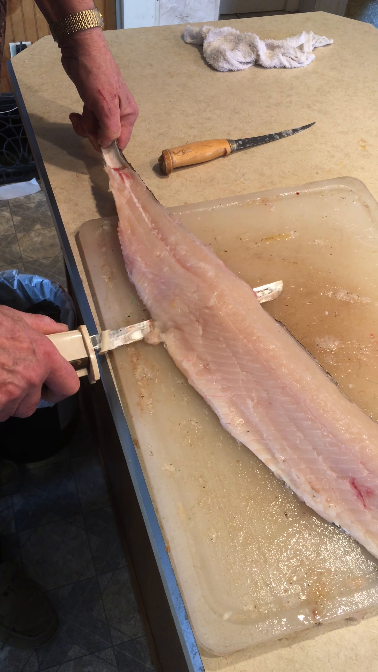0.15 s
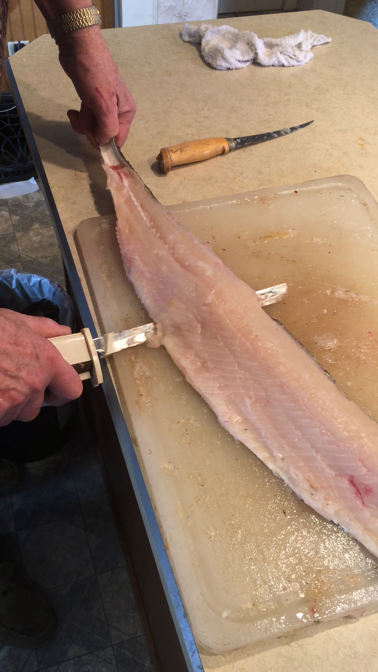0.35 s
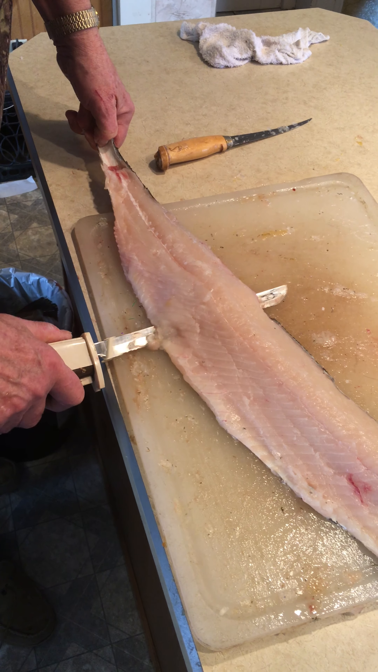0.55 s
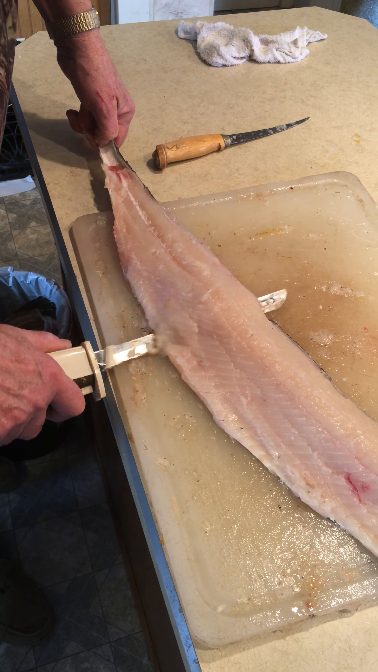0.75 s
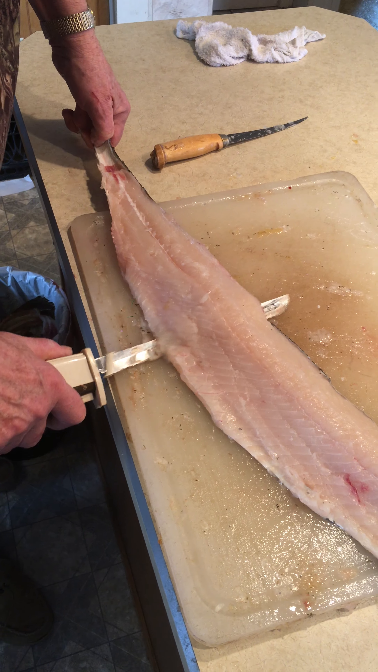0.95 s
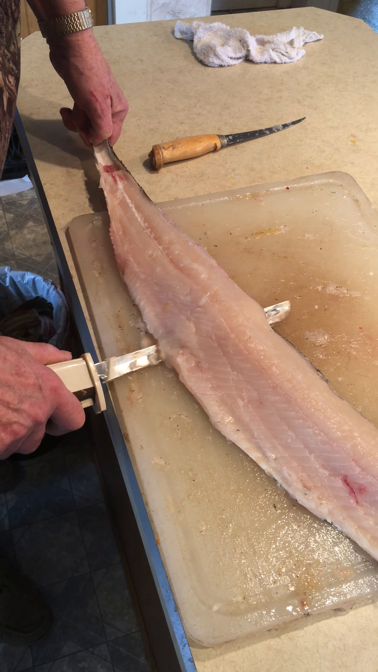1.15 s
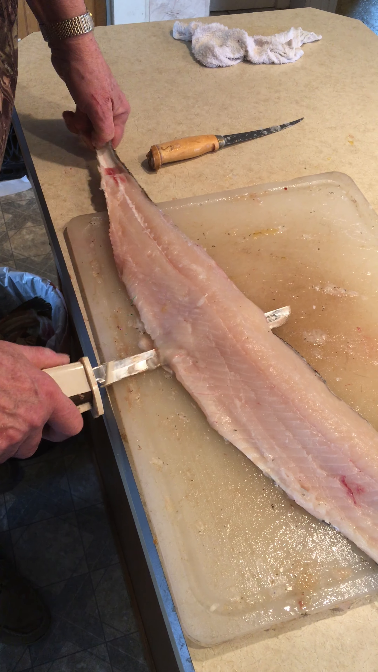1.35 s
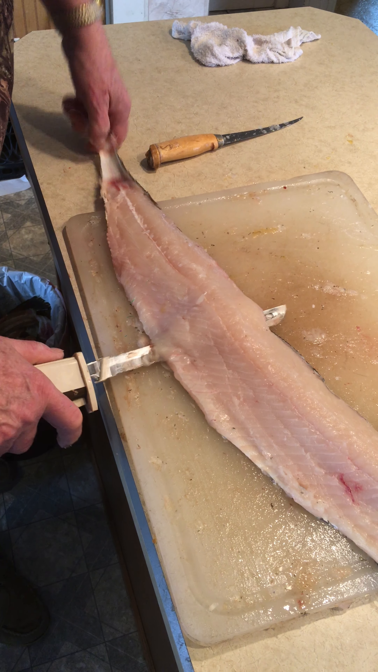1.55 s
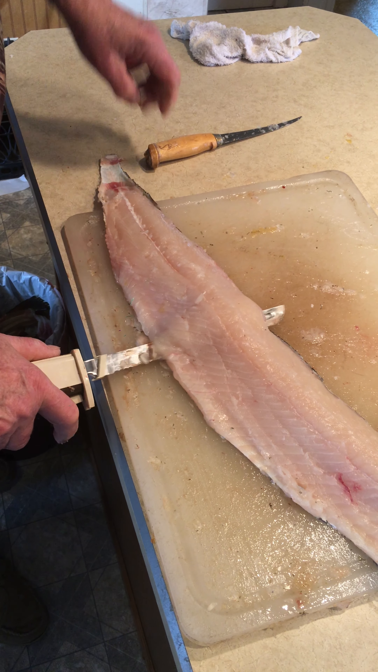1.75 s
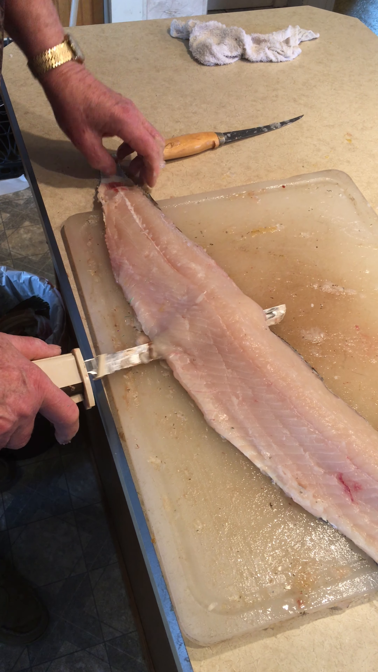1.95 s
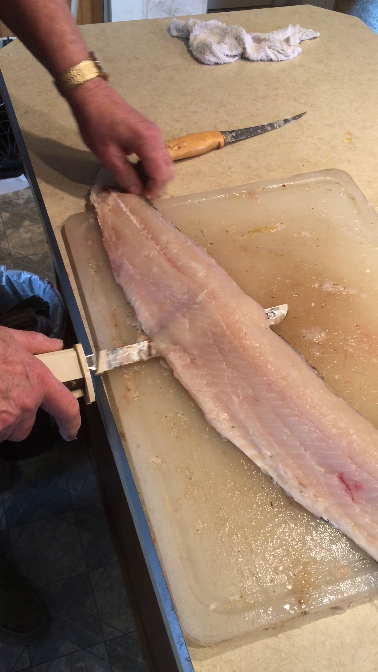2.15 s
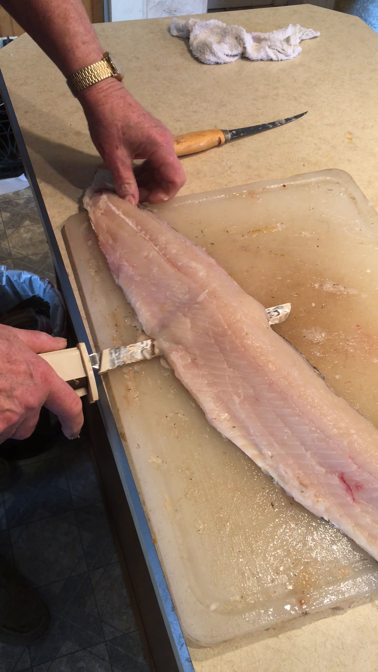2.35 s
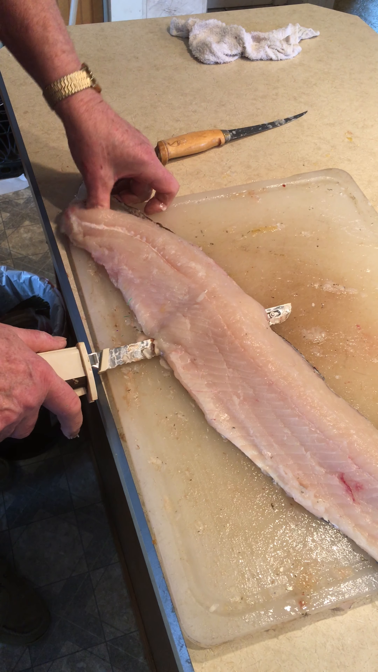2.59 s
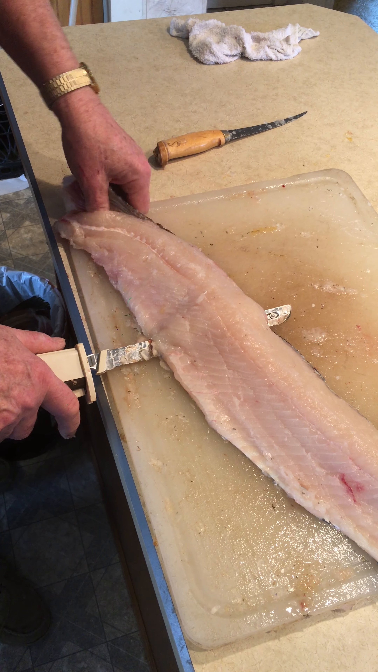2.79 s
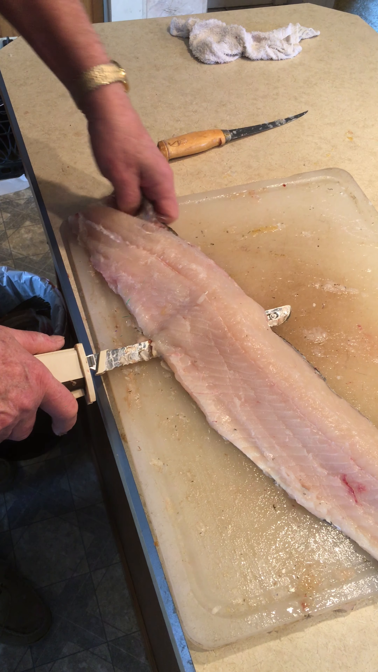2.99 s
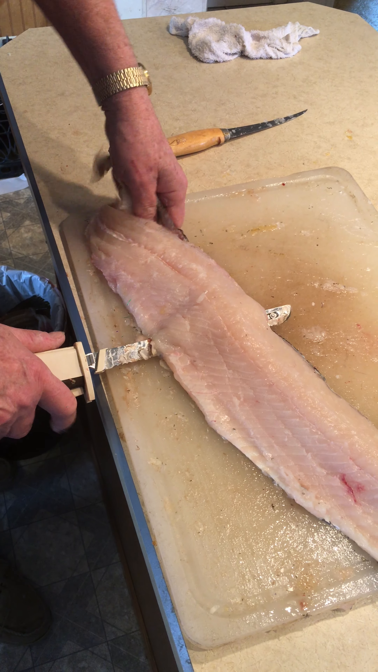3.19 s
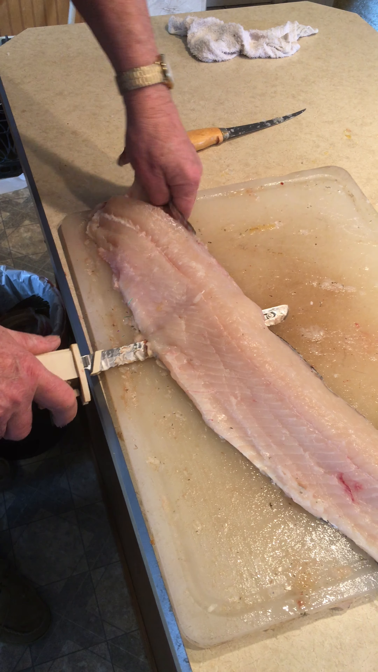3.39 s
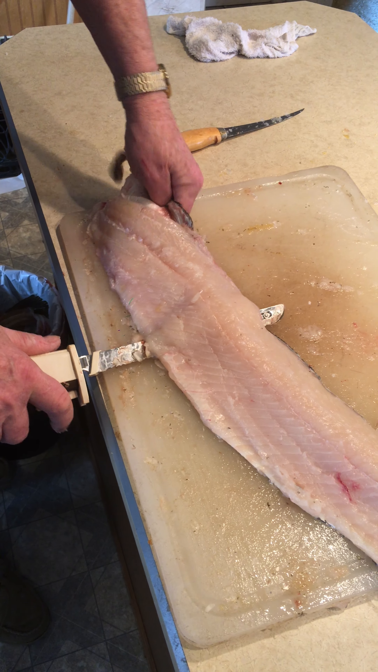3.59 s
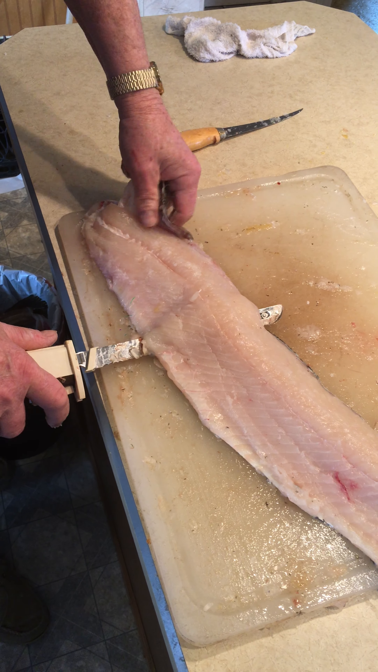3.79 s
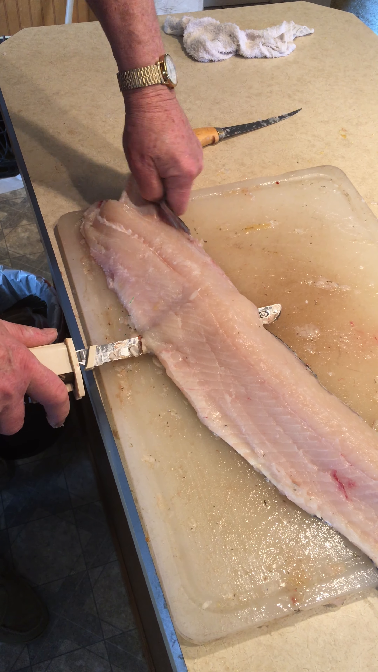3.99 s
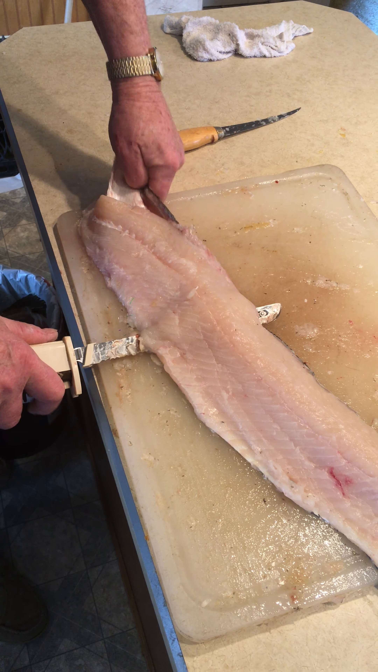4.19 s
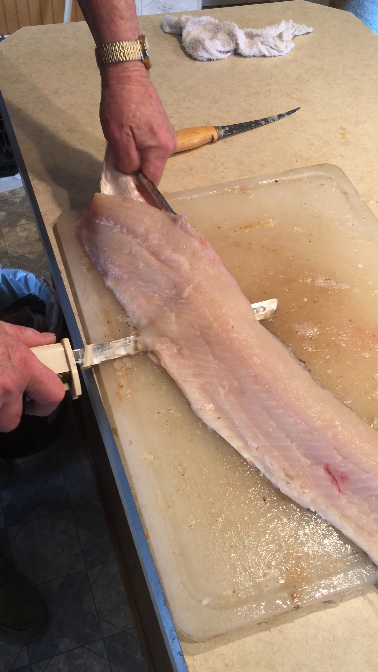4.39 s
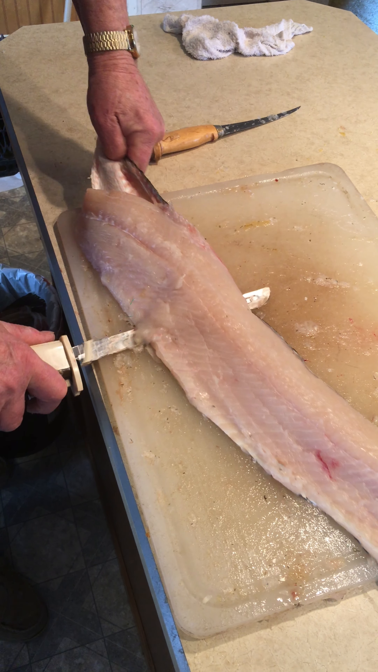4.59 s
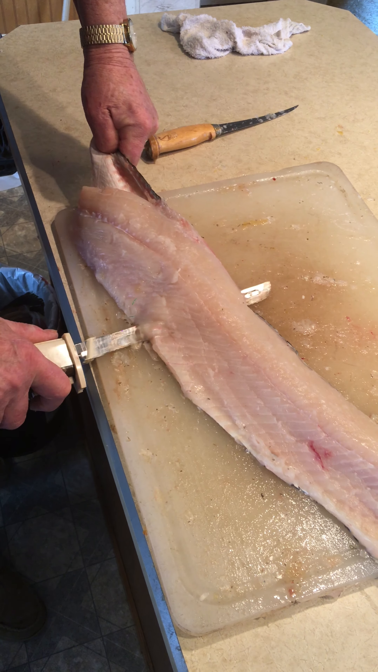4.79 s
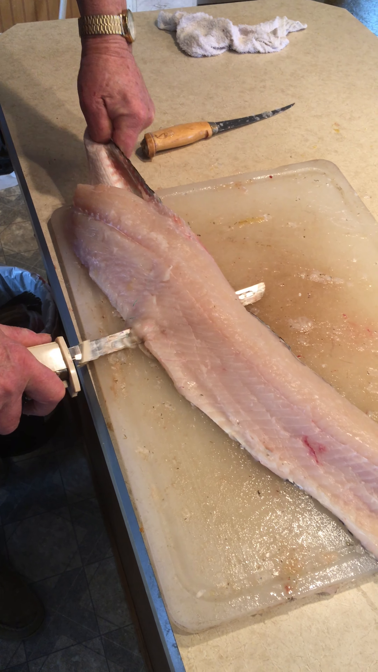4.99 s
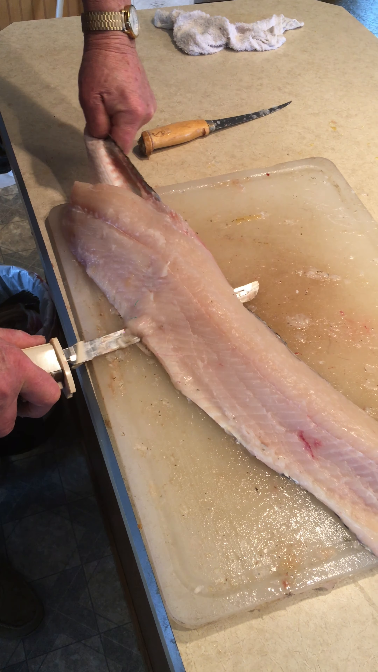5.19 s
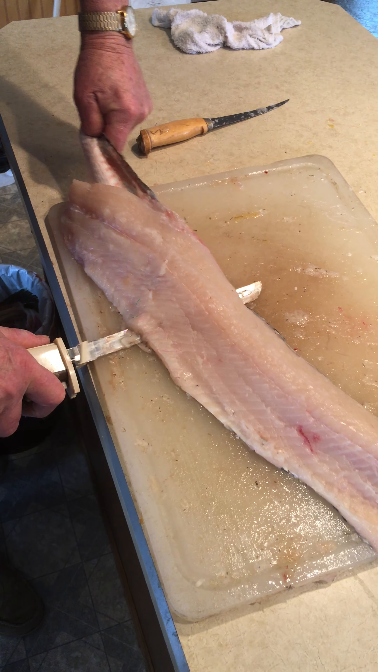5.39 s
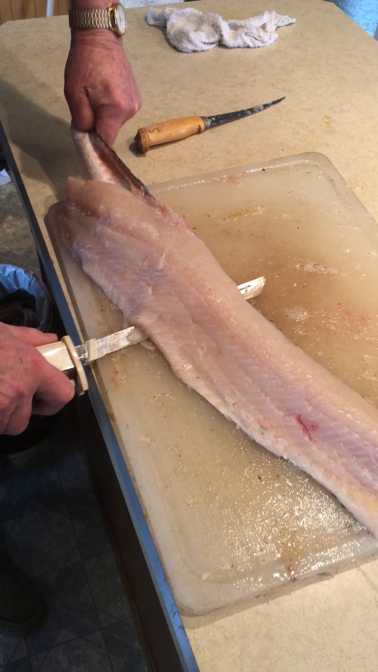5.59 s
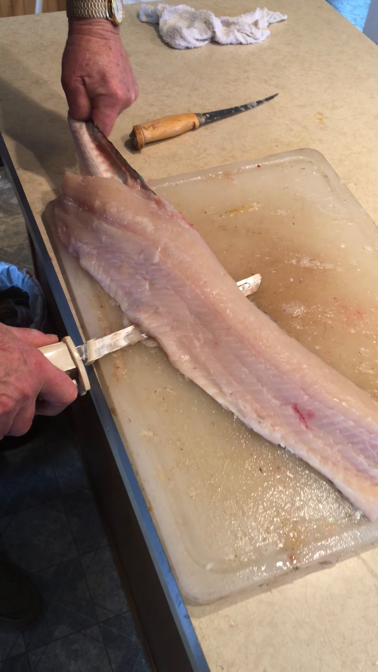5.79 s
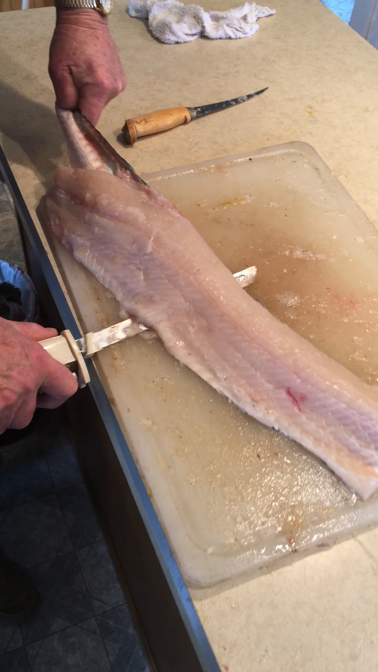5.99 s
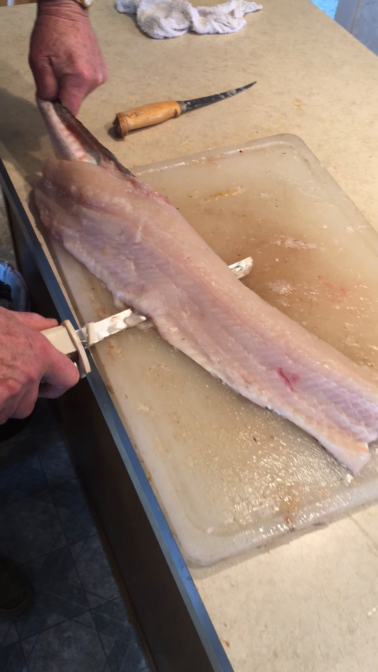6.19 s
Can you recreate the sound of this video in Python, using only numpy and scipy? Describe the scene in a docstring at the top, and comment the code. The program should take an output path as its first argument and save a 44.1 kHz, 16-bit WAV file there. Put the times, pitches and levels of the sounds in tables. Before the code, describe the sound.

A harsh, buzzing electric knife skins a fish on a plastic board, heard close with slight indoor reverberation. The motor coasts down, its rattle breaking into separate knocks before stopping. In the quiet, muffled thuds, light rubbing and squelchy skin noises grow busier over faint room tone. The knife clicks on again, revs up quickly, knocks on the board a few times and keeps whining and rattling.

```python
"""Skinning a fish with an electric knife

An electric fillet knife skins a fish on a plastic board in a small kitchen.
Its mains motor whines and drives two blades to and fro through a rattling gear, louder the faster it turns.
When the trigger is let go it coasts to a halt against friction; pressed again, it spins up with sparking brushes.
In the pause a hand takes a new grip on the wet skin, with squelches and soft bumps on the counter.
Tones are sine waves locked to the blade strokes; knocks, smacks and rubbing are filtered pulses and noise."""
import sys
import numpy as np
from scipy import signal
from scipy.fft import rfft, irfft, next_fast_len
from scipy.io import wavfile
from scipy.ndimage import map_coordinates

SR = 44100
rng = np.random.default_rng(int(sys.argv[2]) if len(sys.argv) > 2 else 0)


def transcribe(signal):
    """Save signal, clipped to [-1, 1], as a 16-bit WAV file at the path in sys.argv[1]."""
    frames = np.atleast_2d(signal).T
    limited = np.clip(frames, -1, 1)
    pcm = np.round(limited * 32767).astype(np.int16)
    wavfile.write(sys.argv[1], SR, pcm)


N = 275625  # length in samples

# Levels in the tables set the balance within one sound, unless a peak is named; mixing gains follow later.
# Tables of tone colour all have the columns: pitch_hz, level_db (per Hz).

# speed that the cut allows the motor, one table per cut of the knife: time_s, speed_strokes_per_s
CUT_PACE = [
    [(0, 28.68), (.4, 28.68), (.65, 28.96), (.85, 28.96), (1.05, 28.68), (1.25, 28.66), (1.43, 28.87)],
    [(4.55, 29), (4.7, 29.18), (4.85, 29.65), (5.1, 29.33), (5.3, 29.97), (5.5, 29.95), (5.75, 29.2),
     (6, 28.63), (6.25, 28.18)],
]
# the whine is split by the mains into strands 120 Hz apart, one table per cut: time_s, main_db, upper_db
WHINE_STRANDS = [
    [(0, -38, -35), (.22, -33, -34.5), (.35, -38.5, -31.5), (.55, -34, -41), (.8, -34.5, -44),
     (.95, -30.5, -41), (1.2, -29, -37), (1.34, -30.5, -46), (1.42, -35, -45)],
    [(4.5, -46, -46), (4.68, -33.5, -42), (4.83, -37, -28), (4.97, -38.5, -35.5), (5.1, -34.5, -47),
     (5.25, -27, -42), (5.5, -27.5, -42), (5.72, -30.5, -64.5), (5.88, -31.5, -47), (6.04, -34, -35),
     (6.14, -50.5, -26), (6.25, -26, -35)],
]
# tones of the loaded drive: multiple_of_stroke_rate, then level_db in the first and in the second cut
HUM_MULTIPLES = [3, 4, 5, 6, 7, 10, 15, 17, 26, 29, 32, 33, 70, 89, 90, 290, 400, 440, 480]
HUM_FIRST_DB = [-53, -57, -63, -45.5, -51, -43, -54, -50, -46, -41.5, -43, -40, -41.5, -48, -40, -52, -52,
                -53, -58]
HUM_SECOND_DB = [-54.5, -56, -54, -46, -51.5, -46, -67, -72, -49.5, -44.5, -51, -41.5, -43.5, -42, -45.5,
                 -53, -59, -57, -64]
# gear contacts within each stroke: place_share_of_stroke, load_knock_db, coast_knock_db, click_db, tip_tick_db,
# fade_power_of_speed (half of coast_knock_db still counts under load)
GEAR_CONTACTS = [(0, -20, -10, -3, -1, 0), (.235, -5, -15, -2, -7, .6), (.52, -9, -24, -14, -26, 1),
                 (.752, 2, -12, -2, -18, 1), (.785, -6, -10, -4, -26, 1)]
# how hard the blades bite into the skin: time_s, added_knock_db (under load)
BITE_FORCE = [(0, 1), (.55, 1), (.8, 2), (1.15, 0), (1.35, 2), (1.55, 2), (4.3, -2), (5, -3), (5.3, 0),
              (5.75, 1.5), (6.25, -.5)]
# loudness against speed: load_db, coast_db (both at full speed), load_power_of_speed, coast_power_of_speed
RATTLE_LOUDNESS = (-33, -36.5, 1.58, 1.38)
HISS_LOUDNESS = (-38, -37, 1.1, 1.27)
WHIRR_LOUDNESS = (-41.5, -45, 2.4, 0.3)
# tone colours of the housing, the hollow handle and the hissing blades
HOUSING_COLOUR = [(100, -36.5), (250, -12), (400, -5), (650, -8), (800, 2.5), (980, -3), (1150, -1),
                  (1550, -5), (2100, -2.5), (2500, -4), (2750, -7.5), (3300, -7.5), (4200, -5.5),
                  (5200, -15), (12000, -77)]
HANDLE_COLOUR = [(40, -52), (100, -33), (340, -7), (620, -14), (750, 2), (835, 3), (890, -1), (950, 1.5),
                 (1040, -12), (1250, -1.5), (1500, -11), (3300, -9), (4200, -10), (5200, -12), (12000, -40)]
BLADE_COLOUR = [(2500, -46), (5000, 5), (6300, 8), (7500, 1), (9300, 5.5), (10500, 0.5), (12500, 1),
                (15000, -5), (18000, -21)]
# tone colours of gear knocks, of clicks, of blade tip ticks and of the slack gear's dull clunk
KNOCK_COLOUR = [(40, -38), (120, -15), (340, -15.5), (620, 4.5), (830, 16), (960, 12), (1100, 5.5),
                (1280, 5.5), (1600, -9), (2500, -4.5), (3300, -19), (4250, -32.5), (5000, -25), (6000, -15),
                (12000, -57)]
CLICK_COLOUR = [(1000, 5), (3000, 1), (5500, -8), (7000, -6), (8000, 2.5), (9300, 4.5), (11000, -27),
                (13000, 3.5), (18000, -21)]
TIP_COLOUR = [(2000, -44), (6000, -37), (7000, 6), (8000, -12), (10200, -1), (11300, 5.5), (13200, -14),
              (14500, -1), (18000, -18)]
CLUNK_COLOUR = [(120, -11), (320, 5.5), (600, -3), (1500, 0.5), (2500, -3.5), (8000, -16)]
# overtones of the whirr: multiple_of_stroke_rate, load_db, coast_db, fuzz_hz, clean_share
WHIRR_OVERTONES = [(80, -10, -21, 160, .8), (160, -5, -8, 330, .7), (240, -5, -12, 400, .8),
                   (340, -8, -8, 520, .5)]
# the housing's response to those overtones: pitch_hz, gain_db
WHIRR_RESPONSE = [(650, -15), (900, 4), (1150, -28), (1700, -54), (2400, -3.5), (2750, 0.5), (3150, 3.5),
                  (3400, -1), (3900, -0.5), (5200, -23), (7000, -17), (9000, -8.5)]
# tone colour of the brushes scraping on the slowing commutator
SCRAPE_COLOUR = [(900, -18), (1800, -8), (2500, 8), (3300, 2.5), (4300, 0.5), (6000, -19), (12000, -36)]
# falling whine of the coasting commutator: multiple_of_stroke_rate, level_db, fuzz_hz, fuzz_share
FALLING_WHINE = [(342, -46.5, 450, 1), (480, -63, 300, 1)]
# its strength, greatest just before the brushes stop singing: speed_strokes_per_s, gain
FALLING_WHINE_GAIN = [(5.6, 0), (6.7, 1.25), (8.5, .9), (11.5, 1), (14.5, .55), (17, .2), (29, .25)]
# tone colour of the blades chattering in their sockets at both ends of the stroke
CHATTER_COLOUR = [(2000, -27.5), (3400, -10), (3750, -1.5), (4250, 3), (4650, -4.5), (5200, -11),
                  (9000, -23.5)]
# tone colour of the room tone, and the kitchen's reverberation: pitch_hz, t60_s
ROOM_COLOUR = [(20, -8), (35, -1), (60, 8), (108, -1.5), (192, -7), (516, -15.5), (1090, -16), (3010, -22),
               (4800, -24.5), (9300, -45), (14400, -32), (18000, -37)]
KITCHEN_DECAY = [(150, 0.41), (1200, 0.46), (3000, 0.41), (8000, 0.11), (16000, 0.25)]
# the handle leans on the counter and thumps once a stroke: start_s, length_s, level_db, place_share_of_stroke
HANDLE_LEANS = [(0.904, 0.185, -25, 0.767), (4.899, 0.123, -25.5, 0.225)]
# hand or handle bumps the counter, each with one rebound: start_s, level_db
COUNTER_BUMPS = [(1.989, -34), (2.191, -40), (2.485, -34.5), (2.969, -32.5), (3.133, -27.5), (3.53, -43),
                 (4.909, -45), (4.94, -25.5)]
# taps on the board, and the click of the trigger at 4.29 s: start_s, peak_db, pitch_hz
TAPS_AND_CLICK = [(1.926, -22, 1290), (2.48, -34.5, 900), (3.881, -37, 900), (4.213, -42.5, 1380),
                  (4.29, -36, 1100), (4.904, -19, 1370), (4.912, -16, 960), (4.941, -20, 1300),
                  (4.947, -20, 960)]
# tone colour of thuds on the counter
THUD_COLOUR = [(25, -21), (48, -3.5), (75, -7), (115, 0), (170, -6.5), (280, -17), (500, -29), (1200, -31),
               (4000, -75)]
# the fillet slides on the board: height_s, rub_db, rumble_db, rise_s, fall_s
FILLET_SLIDES = [(2.599, -55, -70, 0.066, 0.28), (2.81, -64, -59, 0.093, 0.075),
                 (3.22, -80, -56, 0.08, 0.12), (3.5, -60, -53.5, 0.27, 0.1), (3.66, -57, -73, 0.068, 0.17),
                 (4.2, -99, -63, 0.13, .1)]
# tone colours of the rub, of the counter's rumble and of the hollow hum
RUB_COLOUR = [(400, -8), (900, -8.5), (1150, -11.5), (1450, -8), (2200, -6.5), (2800, -11.5), (5000, -30)]
RUMBLE_COLOUR = [(20, -30), (48, 14.5), (110, -5), (300, -25), (900, -57)]
HOLLOW_COLOUR = [(600, -30), (1040, -21), (1120, -6), (1210, -8), (1800, -50)]
# loudness of the hollow hum: time_s, level_db
HOLLOW_LOUDNESS = [(2.3, -85), (2.6, -61), (3.2, -75), (3.42, -66), (3.7, -61.5), (3.95, -70), (4.2, -93)]
# the fingers squeeze or peel the skin: height_s, crackle_db, rise_s, fall_s
SKIN_SQUEEZES = [(2.5, -60.5, 0.092, 0.33), (3.28, -58.5, 0.21, 0.098), (3.43, -57, 0.02, 0.12),
                 (3.72, -51.5, 0.045, 0.06), (3.86, -57, 0.065, 0.059), (4.14, -59.5, 0.13, 0.19),
                 (4.29, -55.5, 0.085, 0.043)]
# the loudest smacks of wet skin: start_s, peak_db, pitch_hz, t60_s, snap_peak_db
SKIN_SMACKS = [(2.648, -43, 14000, .008, -48), (3.14, -42.5, 2200, 0.018, -49),
               (3.157, -44, 4300, 0.01, -38), (3.227, -48, 6000, .006, -40), (3.241, -43, 2360, .01, -52),
               (3.267, -31, 2000, 0.025, -38), (3.295, -40, 2000, 0.01, -55),
               (3.304, -28.5, 8060, 0.0059, -45), (3.38, -57, 4500, .006, -44),
               (3.398, -34, 3200, 0.027, -35), (3.405, -41, 3600, .008, -36),
               (3.42, -40, 9000, 0.0054, -46), (3.446, -41, 2500, 0.0058, -38),
               (3.471, -23.5, 2350, 0.02, -53), (3.568, -44, 7000, .005, -50),
               (3.646, -49, 3280, .008, -59), (3.658, -32.5, 3840, 0.0087, -51),
               (3.663, -34, 3860, 0.0094, -49), (3.668, -37, 4500, .007, -50),
               (3.693, -24.5, 6140, .014, -48), (3.713, -32, 8000, 0.027, -40),
               (3.717, -31, 5600, 0.025, -44), (3.731, -29, 2420, 0.0058, -30),
               (3.734, -36, 3960, 0.004, -36), (3.738, -27, 2450, 0.0092, -42),
               (3.742, -30, 3460, 0.0065, -42), (3.763, -29.5, 3070, 0.026, -23),
               (3.809, -45, 5000, .004, -37), (3.822, -38, 3830, .008, -48), (3.847, -37, 5850, .02, -46),
               (3.866, -34, 7060, .004, -42), (3.871, -47, 8000, .004, -44), (3.882, -23, 7050, 0.003, -16),
               (3.902, -42, 7550, .003, -28), (3.918, -39, 3430, 0.0089, -29),
               (4.003, -42.5, 5030, 0.0082, -47), (4.059, -47, 4000, 0.0053, -32),
               (4.1, -37, 8500, .01, -45), (4.137, -38, 9100, 0.025, -45), (4.29, -34, 3700, 0.016, -36)]
# tone colour of the wet crackle
WET_COLOUR = [(500, -24), (1100, 8), (1600, 0), (2800, 6.5), (5000, 2.5), (8000, 6), (13000, 0.5),
              (18000, -15)]
# tone colour of the growl as each half wave of the mains jerks the starting motor
GROWL_COLOUR = [(200, -26), (600, -10), (780, -6), (900, 9), (1020, -4), (1250, -23), (2000, -30),
                (6000, -51)]

FULL_SPEED = 29  # strokes per second
FIRST_STROKE = .44  # where in the stroke the scene starts (share)
MAINS_HZ, TOP_HZ = 60, 18400  # mains frequency; nothing sounds above the second
# the trigger is let go and pressed again; the shaft breaks free a moment later (s)
OFF_S, ON_S, BREAKAWAY_S = 1.43, 4.29, .012
# the current rises and dies quickly; the gear takes longer to go slack (s)
SWITCH_S, SLACKEN_S = .024, .14
# steady friction (strokes per second lost each second), and a quick first sag (strokes per second, s)
FRICTION, SAG, SAG_S = 20.5, 1.5, .06
SPIN_UP_S = .205  # time constant of the rotor's energy
STRAIN_DB = 4.5  # extra rattle while the motor strains, greatest near standstill
# under load the clicks follow the knocks: dB added, share of the knock's dB
CLICK_LOAD_DB, CLICK_FOLLOWS = 4, .5
# loose knocks of the slack gear between the regular ones: per second, strength (dB)
LOOSE_PER_S, LOOSE_DB = 26, -11
WHINE_ORDER = 80  # multiple of the stroke rate
LOWER_STRAND_DB, HUM_COAST_DB = -45.5, -11  # lower whine strand; drive tones coasting against load
# a narrow housing resonance lifts each driven tone that sweeps through it: Hz, half width Hz, added gain
SING_HZ, SING_WIDTH_HZ, SING_GAIN = 1845, 40, 4
SHAFT_SHIVER = .002  # unsteadiness that blurs the highest tones (radians of the stroke)
# the straining brushes spark harder and flutter with the mains: gain, depth (0-1)
SPARK_GAIN, SPARK_FLUTTER = 24, .55
# coasting, the brushes fall quiet once a stroke: share of the stroke, depth (0-1), sharpness
LULL_AT, LULL_DEPTH, LULL_SHARP = .444, .98, 11
SCRAPE_DB, CRAWL = 1, 4.5  # scrape within the whirr; strokes per second below which the whirr fades
# blade chatter: dB, place within each half stroke (share), t60 of one chatter (s)
CHATTER_DB, CHATTER_AT, CHATTER_T60 = -32.5, .44, .022
# leaning handle: edge (s), share of shudder, and the pitch below which it cannot shake the counter
LEAN_EDGE_S, LEAN_SHUDDER, LEAN_LOW_HZ = .022, .031, 85
REBOUND_S, REBOUND_DB = .032, -7.5
# each smack has a bright snap of a slime film: Hz, t60 (s)
SNAP_HZ, SNAP_T60 = 12500, .0055
# stray smacks during a squeeze: tries per second, dB over the crackle, middle pitch
STRAY_PER_S, STRAY_DB, STRAY_HZ = 22, 11, 5200
# growl: dB at its height, time from trigger to height, rise and fall (s)
GROWL_DB, GROWL_PEAK_S, GROWL_RISE_S, GROWL_FALL_S = -37.5, .059, .021, .02


def amp(db):
    """Turns decibels into a gain."""
    return 10 ** (np.asarray(db) / 20)


def unit(x):
    """Scales a sound to an average strength (rms) of 1."""
    return x / np.sqrt(np.mean(x ** 2) + 1e-20)


def along(points, hz):
    """Reads (Hz, value) points on a logarithmic pitch axis."""
    f, v = np.transpose(points)
    return np.interp(np.log(hz + 1), np.log(f + 1), v)


def curve(rows):
    """Joins (s, value) rows by straight lines, one value per sample."""
    return np.interp(np.arange(N) / SR, *np.transpose(rows))


def noise():
    """White noise as long as the scene."""
    return rng.standard_normal(N)


def wobble(rate):
    """A smooth random curve with rate knots a second."""
    knots = rng.standard_normal(int(N * rate / SR) + 4)
    return map_coordinates(knots, [np.arange(N) * rate / SR])


def colour(x, spectrum, size=4096):
    """Rings x through a causal filter of energy 1 with the given spectrum's shape."""
    # folding the cepstrum gives a filter that never rings ahead of its blow
    cepstrum = irfft(np.log(amp(along(spectrum, np.fft.rfftfreq(size, 1 / SR)))))
    cepstrum[1:size // 2] *= 2
    cepstrum[size // 2:] = 0
    ring = irfft(np.exp(rfft(cepstrum)))
    return signal.fftconvolve(x, ring / np.linalg.norm(ring))[:N]


def burst(age, t60):
    """Envelope of a blow age seconds old, falling 60 dB in t60 seconds."""
    return (age >= 0) * amp(-60 * np.abs(age) / t60)


def swell(s, rise, fall):
    """Gain that grows to 1 at s seconds and dies away, with the two time constants given."""
    age = np.arange(N) / SR - s
    return np.exp(-np.maximum(age / fall, -age / rise))


def add(track, s, sound):
    """Mixes a sound into the track at s seconds."""
    part = track[round(s * SR):][:len(sound)]
    part += sound[:len(part)]


def strikes(strokes):
    """A unit impulse, placed between samples, each time the stroke count passes a whole number."""
    reached = np.maximum.accumulate(strokes)
    at = np.interp(np.arange(np.ceil(reached[0]), reached[-1]), reached, np.arange(N))
    taps = at.astype(int)[:, None] + np.arange(-7, 9)
    gap = taps - at[:, None]
    impulse = np.sinc(gap) * np.sinc(gap / 8)
    return np.bincount(np.clip(taps, 0, N - 1).ravel(), impulse.ravel(), N)


def pop(hz, t60, width, crack):
    """A short noise burst, peak 1, that rings around one pitch after a brief crack."""
    t = np.arange(SR // 8) / SR
    push = rng.standard_normal(len(t)) * burst(t, t60)
    ring = signal.lfilter(*signal.iirpeak(min(hz, TOP_HZ), 1 / width, SR), push)
    sound = unit(ring) + crack * unit(push * burst(t, 0.0017))
    return sound / np.abs(sound).max()


def trigger(release):
    """1 while the trigger is held; fades over release seconds when it is let go."""
    t = np.arange(N) / SR
    return np.clip(1 - (t - OFF_S) / release, 0, 1) + np.clip((t - ON_S) / SWITCH_S, 0, 1)


def shaft_speed():
    """Strokes per second: the motor holds its pace, coasts to a halt against friction, then spins up again."""
    t = np.arange(N) / SR
    first, second = map(curve, CUT_PACE)
    idle = np.maximum(t - OFF_S, 0)
    driven = np.maximum(t - ON_S - BREAKAWAY_S, 0)
    coasting = first - FRICTION * idle - SAG * (1 - np.exp(-idle / SAG_S))
    return np.maximum(coasting, 0) + second * np.sqrt(1 - np.exp(-driven / SPIN_UP_S))


def motor_strain(speed, load):
    """How far the driven motor is below full speed, from 0 to 1."""
    return load * np.clip(1 - speed / FULL_SPEED, 0, 1)


def loudness(law, speed, load):
    """Gain as a power of the speed, passing from the loaded law to the coasting one; silent at rest."""
    loaded_db, coasting_db, loaded_power, coasting_power = law
    ratio = np.maximum(speed, 1) / FULL_SPEED
    loaded = load * amp(loaded_db) * ratio ** loaded_power
    coasting = (1 - load) * amp(coasting_db) * ratio ** coasting_power
    return np.minimum(speed, 1) * (loaded + coasting)


def worn_teeth(strokes, fresh, size=1400):
    """Gear roughness: the same flaws pass on every stroke, mixed with a share of fresh noise."""
    bins = size // 2 + 1
    flaws = unit(irfft(np.exp(2j * np.pi * rng.random(bins)) * amp(rng.normal(0, 3.7, bins))))
    repeat = map_coordinates(flaws, [strokes % 1 * size], mode="grid-wrap")
    loose = np.clip(fresh, 0, 1)
    return np.sqrt(1 - loose) * repeat + np.sqrt(loose) * colour(noise(), [(200, -22), (1500, -11.0)])


def gear(strokes, speed, load):
    """The gear rattles in the housing, the blades hiss, and both knock at each turn of the stroke."""
    blows, knocks, clicks, ticks = np.zeros((4, N))
    bite_db = curve(BITE_FORCE)
    for share, loaded_db, coasting_db, click_db, tip_db, fade in GEAR_CONTACTS:
        turn, part = np.divmod(strokes - share + 1, 1)
        age = part / np.maximum(speed, 1)
        uneven = amp(rng.normal(0, 1.2, 256))[turn.astype(int) % 256]
        force = uneven * (speed > 1) * (speed / FULL_SPEED) ** fade
        weight = force * amp(load * (loaded_db + bite_db) + (1.5 - load) * coasting_db)
        blows += weight * strikes(strokes - share)
        knocks += weight * burst(age, 0.0097)
        click_level = amp(click_db + load * (CLICK_LOAD_DB + CLICK_FOLLOWS * loaded_db))
        clicks += force * click_level * burst(age, 0.0062)
        ticks += force * amp(tip_db) * burst(age, 0.0076)
    chance = rng.random(N) < LOOSE_PER_S / SR
    loose = (1 - load) * (speed > 1) * chance * rng.exponential(size=N).clip(0, 2)
    clicks += amp(LOOSE_DB) * signal.fftconvolve(loose, burst(np.arange(SR // 20) / SR, 0.014))[:N]
    # slow strokes knock nearly as hard, so they stand out while the motor coasts
    coast = (FULL_SPEED / np.maximum(speed, 6)) ** (.75 - 0.5 * load)
    shaft = 1 + 0.42 * np.cos(2 * np.pi * 20 * strokes)
    # without load the teeth run slack and no stroke is like the last
    slack = 0.31 * (1 - load)
    body = colour(shaft * worn_teeth(strokes, fresh=0.43 + slack), HOUSING_COLOUR)
    body += amp(9) * coast ** .5 * colour(knocks * worn_teeth(strokes, fresh=0.81 + slack), KNOCK_COLOUR)
    clunks = (1 - load) * burst(strokes % 1 / np.maximum(speed, 1), 0.043)
    body += amp(8.5) * coast * colour(clunks * noise(), CLUNK_COLOUR)
    # each blow also rings the hollow handle
    body += amp(14.6) * colour(blows, HANDLE_COLOUR)
    steel = amp(-4.0) * colour(shaft * worn_teeth(strokes, fresh=0.65), BLADE_COLOUR)
    steel += amp(6.5) * coast * colour(clicks * noise(), CLICK_COLOUR)
    steel += amp(8.5) * coast * colour(ticks * noise(), TIP_COLOUR)
    rattle = loudness(RATTLE_LOUDNESS, speed, load) * amp(STRAIN_DB * motor_strain(speed, load))
    return rattle * body + loudness(HISS_LOUDNESS, speed, load) * steel


def motor(strokes, speed, load):
    """Tones of the loaded drive, and a whine whose close strands beat at twice the mains frequency."""
    t = np.arange(N) / SR
    angle, mains = 2 * np.pi * strokes, 2 * np.pi * 2 * MAINS_HZ * t
    hum, driven = np.zeros(N), trigger(SWITCH_S)
    for order, first_db, second_db in zip(HUM_MULTIPLES, HUM_FIRST_DB, HUM_SECOND_DB):
        sing = 1 + SING_GAIN * driven / (1 + ((order * speed - SING_HZ) / SING_WIDTH_HZ) ** 2)
        level_db = np.where(t < ON_S, first_db, second_db) + 2.3 * wobble(5.5) + 1.23 * wobble(40)
        hum_phase = order * (angle + SHAFT_SHIVER * wobble(120)) + 2 * np.pi * rng.random()
        hum += sing * amp(level_db) * np.sin(hum_phase)
    hum *= amp(-2.0) * (load + (1 - load) * amp(HUM_COAST_DB)) * (speed / FULL_SPEED) ** 4
    # the blades brake the shaft twice a stroke
    phase = WHINE_ORDER * angle + .3 * np.sin(2 * angle) + .12 * wobble(60)
    s, main_db, upper_db = np.vstack(WHINE_STRANDS).T
    main, upper = amp(curve(np.c_[s, main_db])), amp(curve(np.c_[s, upper_db]))
    lower = amp(LOWER_STRAND_DB + 0.91 * wobble(2.9)) * (speed / FULL_SPEED) ** 4
    whine = main * (np.sin(phase) + amp(-18.5) * np.sin(2 * phase))
    whine += upper * np.sin(phase + mains) + lower * np.sin(phase - mains)
    throb = 1 + .2 * np.cos(angle) + .12 * wobble(70)
    whine *= amp(2.0) * throb * driven * np.minimum(speed / FULL_SPEED, 1) ** 2
    # the slow motor draws a heavy current, which makes its iron hum
    inrush = amp(-48.0) * load * np.clip(1.2 - speed / FULL_SPEED, 0, 1) * np.sin(mains)
    return hum + whine + inrush


def brushes(strokes, speed, load):
    """Fuzzy overtones of the commutator light up in the housing's resonance; coasting, it whines down the scale."""
    whirr, glide = np.zeros((2, N))
    for order, loaded_db, coasting_db, fuzz_hz, clean in WHIRR_OVERTONES:
        level = amp(load * loaded_db + (1 - load) * coasting_db)
        resonance = amp(along(WHIRR_RESPONSE, order * speed))
        fuzz = unit(clean + wobble(fuzz_hz)) + 1j * wobble(fuzz_hz)
        whirr += level * resonance * np.real(fuzz * np.exp(2j * np.pi * order * strokes))
    whirr += (1 - load) * amp(SCRAPE_DB) * colour(noise(), SCRAPE_COLOUR)
    for order, db, fuzz_hz, fuzzy in FALLING_WHINE:
        fuzz = 1 + fuzzy * (wobble(fuzz_hz) + 1j * wobble(fuzz_hz))
        glide += amp(db) * np.real(fuzz * np.exp(2j * np.pi * order * strokes))
    glide *= (1 - load) * np.interp(speed, *np.transpose(FALLING_WHINE_GAIN))
    flutter = 1 + SPARK_FLUTTER * np.cos(2 * np.pi * 2 * MAINS_HZ * np.arange(N) / SR)
    sparks = 1 + SPARK_GAIN * motor_strain(speed, load) * flutter
    dip = np.exp(LULL_SHARP * (np.cos(2 * np.pi * (strokes - LULL_AT)) - 1))
    lull = (1 - load) * LULL_DEPTH * dip
    whirr *= loudness(WHIRR_LOUDNESS, speed, load) * sparks * np.minimum(speed / CRAWL, 1)
    return (1 - lull) * (whirr + glide)


def chatter(strokes, speed, load):
    """The driven blades chatter at each reversal in short grains, with ten weaker pulses a stroke from the shaft."""
    age = (2 * strokes - CHATTER_AT) % 1 / np.maximum(2 * speed, 1)
    uneven = (1 - .25 * np.sin(2 * np.pi * strokes)) * amp(2 * wobble(50))
    shaft_pulses = unit((.5 + .5 * np.cos(2 * np.pi * 10 * strokes)) ** 2)
    grains = (uneven * burst(age, CHATTER_T60) + .2 * shaft_pulses) * worn_teeth(strokes, fresh=.4)
    return amp(CHATTER_DB) * load * (speed / FULL_SPEED) ** 3 * colour(grains, CHATTER_COLOUR)


def kitchen(x):
    """The room answers 5 ms late with a noise tail in which each frequency dies at its own speed."""
    hz, t, z = signal.stft(rng.standard_normal(SR // 2), SR, nperseg=256)
    decay = amp(-60 * t / along(KITCHEN_DECAY, hz)[:, None])
    tail = signal.istft(z * decay, SR, nperseg=256)[1]
    return signal.fftconvolve(np.pad(x, (SR // 200, 0)), tail / np.linalg.norm(tail))[:N]


def board(strokes):
    """The leaning handle and the hand thud on the counter; short taps sound on the board and the trigger clicks."""
    thuds, taps = np.zeros((2, N))
    now, t = np.arange(N) / SR, np.arange(SR // 4) / SR
    for s, length, db, share in HANDLE_LEANS:
        touch = np.clip(np.minimum(2 * (now - s), s + length - now) / LEAN_EDGE_S, 0, 1)
        thuds += amp(db + 19.0) * touch * (strikes(strokes - share) + LEAN_SHUDDER * noise())
    # the handle is too light to shake the counter at the lowest pitches
    thuds = signal.sosfilt(signal.butter(2, LEAN_LOW_HZ, "highpass", fs=SR, output="sos"), thuds)
    for s, db in COUNTER_BUMPS:
        for delay, drop_db in (0, 0), (REBOUND_S, REBOUND_DB):
            shudder = 0.071 * rng.standard_normal(len(t)) * burst(t, 0.21)
            add(thuds, s + delay, amp(db + drop_db + 14) * (shudder + (t == 0)))
    for s, db, hz in TAPS_AND_CLICK:
        add(taps, s, amp(db) * pop(hz, 0.029, width=0.28, crack=0.068))
    return colour(thuds, THUD_COLOUR) + taps


def drag():
    """The fillet rubs over the board with a faint hollow hum, while the leaning hand makes the counter rumble."""
    rub = sum(amp(rub_db) * swell(s, rise, fall) for s, rub_db, _, rise, fall in FILLET_SLIDES)
    rumble = sum(amp(rumble_db) * swell(s, rise, fall) for s, _, rumble_db, rise, fall in FILLET_SLIDES)
    hollow = amp(curve(HOLLOW_LOUDNESS)) * colour(noise(), HOLLOW_COLOUR)
    rubbing = rub * amp(2.8 * wobble(25.5)) * colour(noise(), RUB_COLOUR)
    return rubbing + rumble * colour(noise(), RUMBLE_COLOUR) + hollow


def fish():
    """Wet skin smacks under the fingers; each squeeze sets off stray smacks and a crackle of tiny bursting films."""
    smacks = np.zeros(N)
    squeeze = sum(amp(db) * swell(s, rise, fall) for s, db, rise, fall in SKIN_SQUEEZES)
    for s, db, hz, t60, snap_db in SKIN_SMACKS:
        add(smacks, s, amp(db) * pop(hz, t60, width=0.14, crack=0.14))
        add(smacks, s, amp(snap_db) * pop(SNAP_HZ, SNAP_T60, width=0.2, crack=0.36))
    # about 2200 films burst a second
    films = rng.random(N) < 2200 / SR
    grains = films * noise() * amp(5 * np.minimum(rng.exponential(size=N), 2))
    for i in np.flatnonzero(rng.random(N) < STRAY_PER_S / SR):
        level = squeeze[i] * amp(STRAY_DB + rng.normal(0, 2.4))
        pitch = STRAY_HZ * np.exp(rng.normal(0, 0.34))
        add(smacks, i / SR, level * pop(pitch, 0.031, width=0.077, crack=0.15))
    return smacks + squeeze * colour(unit(grains), WET_COLOUR)


def growl(load):
    """For the first few turns the mains jerk the rotor, and the housing growls."""
    jerks = unit(colour(strikes(2 * MAINS_HZ * np.arange(N) / SR), GROWL_COLOUR))
    return amp(GROWL_DB) * load * swell(ON_S + GROWL_PEAK_S, GROWL_RISE_S, GROWL_FALL_S) * jerks


def scene():
    """One shaft drives the running sounds of the knife; fish, board and room join in."""
    speed, load = shaft_speed(), trigger(SLACKEN_S)
    unsteady = 0.00047 * wobble(25) * speed / FULL_SPEED
    strokes = FIRST_STROKE + np.cumsum(speed) / SR + unsteady
    near = gear(strokes, speed, load) + brushes(strokes, speed, load) + chatter(strokes, speed, load)
    near += board(strokes) + drag() + growl(load)
    skin = fish()
    echo = amp(-11.0) * kitchen(near + amp(-0.5) * skin)
    room_tone = amp(-59.5) * colour(noise(), ROOM_COLOUR)
    return (near + skin + motor(strokes, speed, load) + echo + room_tone)[None]


def record(dry):
    """Removes everything above the band limit."""
    size = next_fast_len(N + SR // 4)
    kept = np.fft.rfftfreq(size, 1 / SR) < TOP_HZ
    return irfft(rfft(dry, size) * kept, size)[:, :N]


dry = scene()
out = record(dry)
transcribe(out)
```